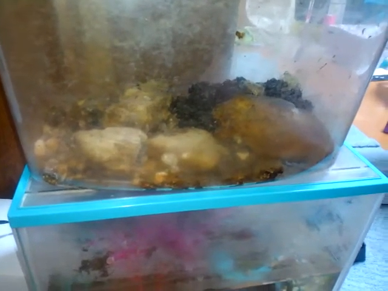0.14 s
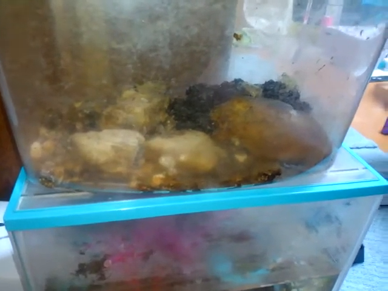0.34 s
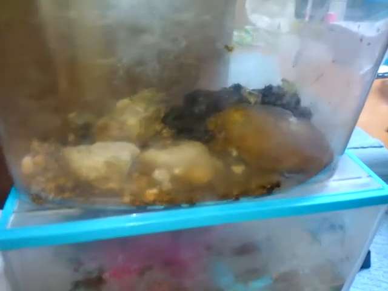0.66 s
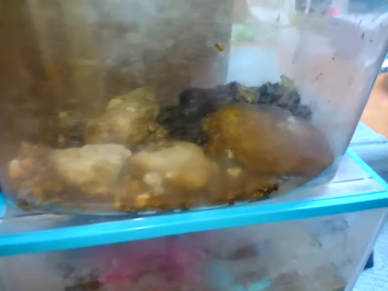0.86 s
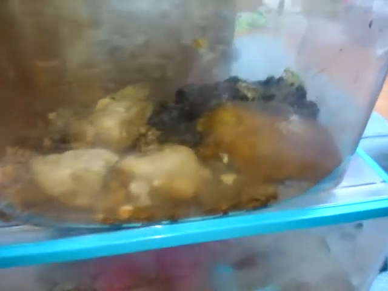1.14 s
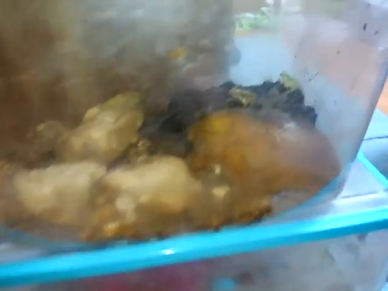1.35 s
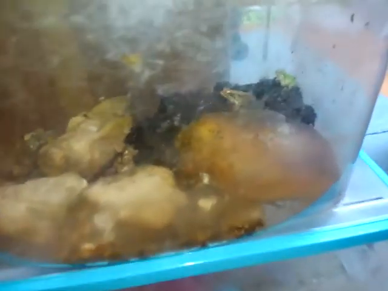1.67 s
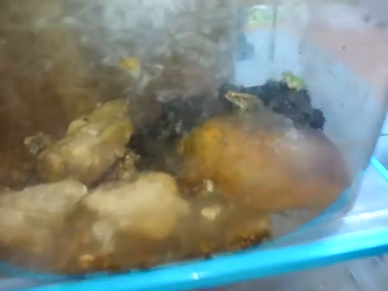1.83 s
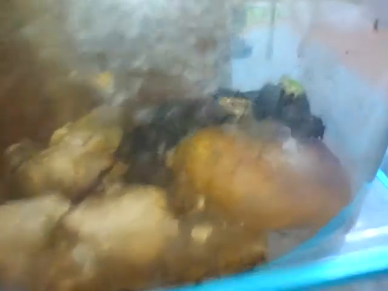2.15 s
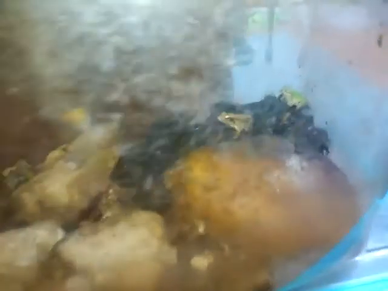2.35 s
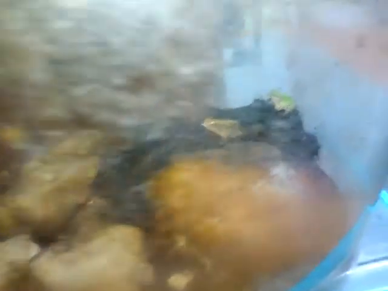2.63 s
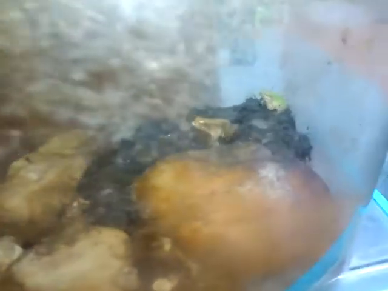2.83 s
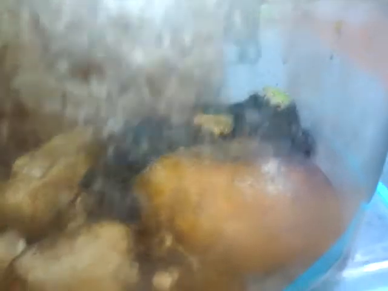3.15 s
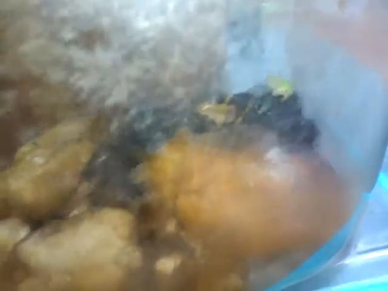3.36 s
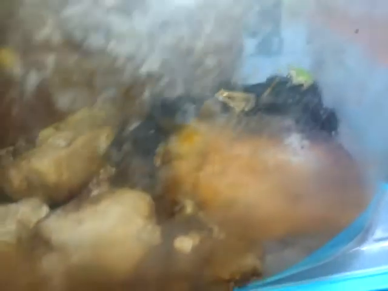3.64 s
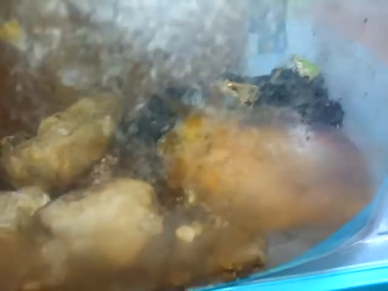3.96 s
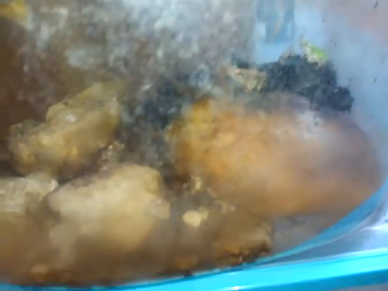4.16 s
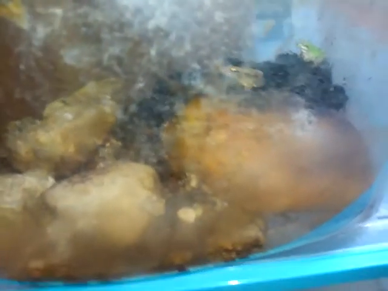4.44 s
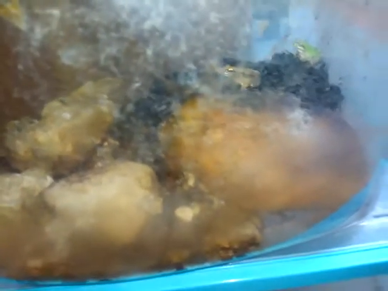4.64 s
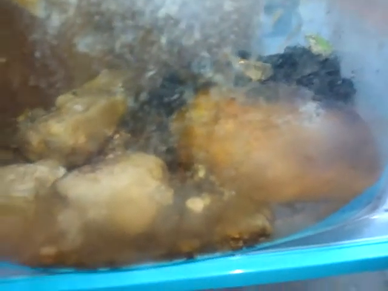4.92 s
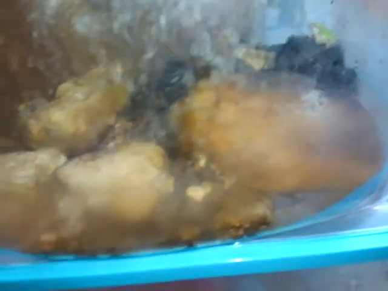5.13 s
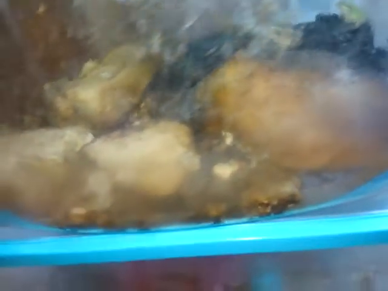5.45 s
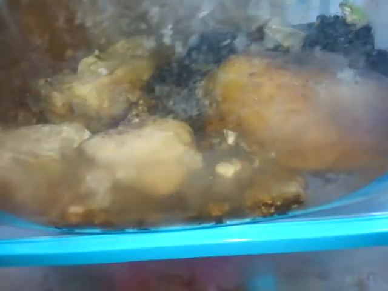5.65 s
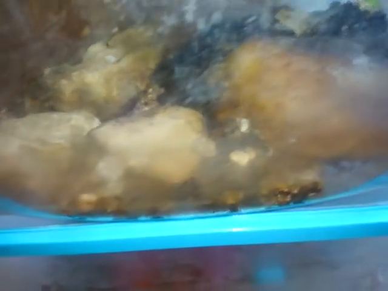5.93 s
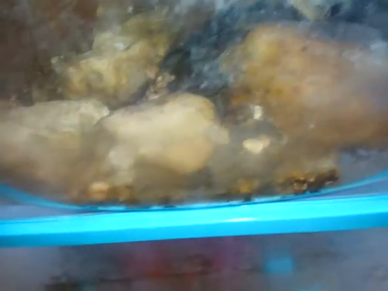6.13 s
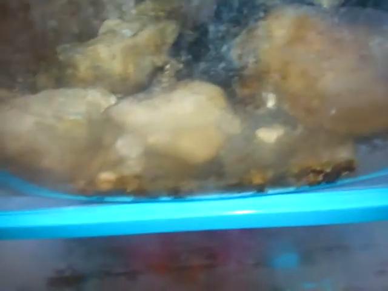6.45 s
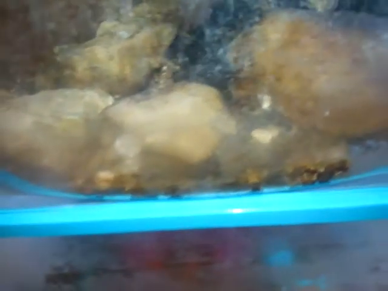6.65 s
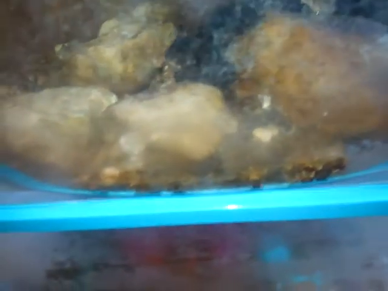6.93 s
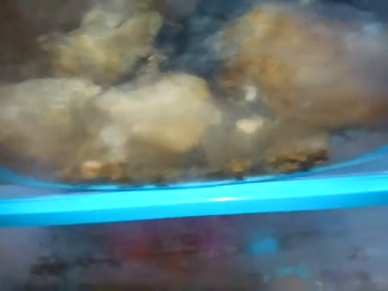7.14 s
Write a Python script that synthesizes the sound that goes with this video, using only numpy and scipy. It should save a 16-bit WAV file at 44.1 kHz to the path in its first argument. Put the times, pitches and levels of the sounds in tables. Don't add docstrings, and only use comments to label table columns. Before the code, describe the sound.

Even, piercing little chirps run from start to end, brighter at first, weaker around the third second, stronger again, then mostly softer late on. Each is a quick rattle of a dozen pure, high pulses with a thin rasp and short reflections. Behind it lie a faint continuous insect trill, steady microphone hiss, low room hum and gentle grip rumble, with a small knock near the beginning.

```python
import sys
import numpy as np
from scipy import signal
from scipy.fft import rfft, irfft
from scipy.io import wavfile
from scipy.ndimage import uniform_filter1d

SR = 44100
rng = np.random.default_rng(int(sys.argv[2]) if len(sys.argv) > 2 else 0)


def materialize(psi):
    bounded = np.clip(np.atleast_2d(psi).T, -1, 1)
    quanta = np.round(bounded * 32767).astype(np.int16)
    wavfile.write(sys.argv[1], SR, quanta)


def elevation(decibels):
    levels = np.asarray(decibels, float)
    return 10 ** (levels / 20)


N = 321489

# (time [s], length [ms], direct level [dB], wing pitch [Hz])
CHIRPS = [(-0.0428, 77, -22.5, 7365), (0.2337, 67.5, -19.5, 7370), (0.4867, 63, -20, 7370),
          (0.7347, 62.6, -21, 7390), (0.9991, 68, -21.5, 7360), (1.2333, 69.4, -20, 7350),
          (1.4567, 61, -19.5, 7360), (1.6981, 72, -23.5, 7310), (1.9675, 71, -26.5, 7270),
          (2.227, 61, -30, 7320), (2.468, 69.4, -30, 7370), (2.7555, 64, -26, 7370),
          (3.0329, 68, -27.5, 7365), (3.3219, 69.6, -22, 7325), (3.5945, 68, -21.5, 7290),
          (3.8486, 66.7, -21.5, 7295), (4.1128, 67.5, -23, 7260), (4.3648, 65, -27.5, 7270),
          (4.6283, 71.4, -22.5, 7320), (4.889, 59.4, -22, 7360), (5.1378, 65, -27.5, 7260),
          (5.4137, 65, -27.5, 7280), (5.6722, 69, -25, 7290), (5.9247, 63, -23, 7300),
          (6.1755, 76, -27.5, 7200), (6.4264, 69, -31, 7310), (6.6936, 54.5, -27.5, 7350),
          (6.9442, 67, -26.5, 7370), (7.2157, 67, -25.5, 7350)]


def evened(x):
    return x / np.sqrt(np.mean(x ** 2) + 1e-20)


def read(points, hz):
    f, value = np.transpose(points)
    return np.interp(np.log(hz + 1), np.log(f + 1), value)


def add(mix, s, sound):
    at = round(s * SR)
    sound = sound[max(-at, 0):]
    part = mix[max(at, 0):][:len(sound)]
    part += sound[:len(part)]


def coloured(points):
    gain = elevation(read(points, np.fft.rfftfreq(N, 1 / SR)))
    return evened(irfft(rfft(rng.standard_normal(N)) * gain, N))


def resonate(x, hz, width):
    turn = np.exp(2j * np.pi * np.cumsum(hz * np.ones(len(x))) / SR)
    r = np.exp(-np.pi * width / SR)
    once = signal.lfilter([1 - r], [1, -r], x / turn)
    twice = signal.lfilter([1 - r], [1, -r], once)
    return 2 * (turn * twice).real


def drift(seconds):
    size = round(seconds * SR)
    once = uniform_filter1d(rng.standard_normal(N), size=size)
    return evened(uniform_filter1d(once, size=size))


def cricket():
    # (time [s], level [dB])
    low_mode = [(0, -37), (.8, -34.5), (1.3, -42.5), (1.95, -36), (2.7, -38.5), (3.9, -43.5), (4.4, -36.5),
                (5.6, -35.5), (6.7, -39), (7.3, -36)]
    trials = [
        2.222,
        2.749,
        5.665,
        6.687,
    ]
    gap_ms = 5.1
    slowing = 0.13
    start_db, swell_share, swell_bend, tire_db = -23, 0.46, 1.33, -2
    first_db = 3.5
    uneven_db, uneven_pitch = 1.3, 0.0035
    usual_db, echo_base_db, echo_follows = -24, -28, 0.26

    tone, sent, gate = np.zeros((3, N))
    chance = rng.standard_normal((len(CHIRPS), 19, 5))
    for (s, length_ms, level_db, hz), dice in zip(CHIRPS, chance):
        count = min(round(length_ms / gap_ms) + 1, 18)
        echo_db = echo_base_db - level_db + echo_follows * (level_db - usual_db)
        low_db = np.interp(s, *np.transpose(low_mode)) + dice[-1, 0]
        rasp_db = -46 + 0.62 * dice[-1, 1]
        for k, (late, loud, sharp, phase, low_phase) in enumerate(dice[:count]):
            along = k / (count - 1)
            slowed = along - slowing * along * (1 - along)
            at = s + (length_ms * slowed + 0.1 * late - 2.2) / 1000
            pitch = hz * (1 + 0.013 * (0.5 - along) - 0.016 * along ** 4 + uneven_pitch * sharp)
            swell_db = start_db * max(1 - along / swell_share, 0) ** swell_bend
            swell_db += tire_db * along ** 4 + first_db * (k == 0)
            burst = elevation(level_db + swell_db + uneven_db * loud) * stroke(pitch, 4.36, 0.026, phase)
            add(tone, at, burst)
            add(sent, at, elevation(echo_db) * burst)
            low = stroke(6930 - 160 * along ** 2 + 60 * sharp, 4.8, 0.088, low_phase)
            low = elevation(-55 * np.maximum(0.8 - along, 0) ** 1.1) * low
            add(sent, at, elevation(low_db + 0.5) * low)
            add(tone, at + 0.00088, elevation(low_db + 5.0) * low)
            scrape_db = rasp_db - 20.6 * (along - 0.45) ** 2 + 2.8 * late
            add(gate, at, elevation(scrape_db) * np.hanning(230))
    for s in trials:
        add(tone, s - 0.0022, elevation(-55) * stroke(7200, 4.4, 0.018, 0))
        add(gate, s - 0.0022, elevation(-55) * np.hanning(230))
    return tone, sent, gate


def stroke(hz, length_ms, glide, phase):
    u = np.linspace(0, 1, round(length_ms * SR / 1000))
    turns = np.cumsum(hz * (1 - glide * (u - 0.5))) / SR
    return np.sin(np.pi * u) ** 1.45 * np.sin(2 * np.pi * (turns + phase))


def scraper(gate):
    # (frequency [Hz], density [dB per Hz])
    rasp = [(4710, -14), (8000, -1.5), (8450, -10.5), (8930, -9.5), (9160, -8.5), (9620, -7.5),
            (11300, -13.5), (11700, -17.5), (12800, -34), (16600, -70), (22000, -120)]
    core_hz = rng.uniform(9230, 10830, len(CHIRPS))
    chirp = np.searchsorted([row[0] - 0.05 for row in CHIRPS], np.arange(N) / SR) - 1
    core = evened(resonate(rng.standard_normal(N), core_hz[chirp], 720))
    below = [(1000, -36), (1600, -24.5), (5500, -27), (6200, -11.5), (6600, -17), (7200, -12)]
    skirt = below + [row for row in rasp if row[0] > 7500]
    return gate * (coloured(skirt) + 0.48 * core)


def room(x):
    # (frequency [Hz], time to fall 60 dB [s])
    near_walls = [(5000, 0.22), (7000, 0.15), (9000, 0.16), (12000, 0.06)]
    hall_t60, hall_db = 0.44, -25.5
    size = SR // 2
    taps = np.zeros((3, size))
    slots = np.arange(40, size - 12, 12)
    at = slots + rng.integers(0, 12, (3, len(slots)))
    np.put_along_axis(taps, at, rng.choice([-1., 1.], at.shape), 1)
    hz, t, z = signal.stft(taps, SR, nperseg=128)
    decay = elevation(-60 * t / read(near_walls, hz)[:, None]) + elevation(hall_db - 60 * t / hall_t60)
    decay = decay * (1 - 0.15 * np.exp(-t / 0.0041))
    tails = signal.istft(z * decay, SR, nperseg=128)[1]
    tails = tails / np.linalg.norm(tails[0])
    sway = np.pi * (np.arange(N) / SR * 1.3 + np.arange(3)[:, None] / 3)
    shared = x * np.cos(sway) / np.sqrt(1.5)
    return signal.oaconvolve(shared, tails, axes=1)[:, :N].sum(0)


def handling():
    # (time [s], level [dB], width [ms], direction [+1 or -1])
    bumps = [(1.2802, -36.5, 0.72, 1), (2.0243, -32.5, 0.91, -1), (2.5878, -40, 0.86, 1),
             (2.605, -41, 1.1, -1), (2.611, -47, 4.5, 1), (0.574, -35.5, 4.1, 1), (4.6, -40, 2.9, 1),
             (0.401, -47, 2.2, 1), (1.17, -41, 4.1, 1), (1.439, -43, 3.1, 1), (1.665, -38.5, 3.3, -1),
             (3.851, -39, 3.7, 1)]
    # (time [s], level [dB], length [ms], centre [Hz], width [Hz])
    rustles = [
        (1.208, -48, 13, 930, 60),
        (1.210, -48, 14, 560, 60),
        (1.208, -55, 11, 2100, 1800),
        (4.286, -62, 18, 10000, 4000),
        (4.286, -66, 10, 6000, 4000),
        (4.329, -66, 10, 9500, 4000),
        (5.593, -62, 28, 10300, 3000),
        (5.593, -66, 14, 5000, 4000),
        (5.27, -66, 14, 3500, 3000),
    ]
    t = np.arange(N) / SR
    squeeze = np.max([np.exp(-((t - row[0]) / 0.034) ** 2) for row in bumps], axis=0)
    rumble = coloured([(8, -15), (20, 5.5), (70, -0.5), (130, -33.5)])
    rumble = rumble / abs(uniform_filter1d(rumble ** 2, size=5000)) ** 0.5
    out = elevation(-55.5 + 2.5 * squeeze + 1.5 * drift(0.12)) * rumble
    for s, level_db, width_ms, direction in bumps:
        u = np.arange(-3, 12, 1000 / SR / width_ms)
        push = np.exp(-u ** 2 * np.where(u < 0, 2.5, 0.6))
        push -= 0.29 * np.exp(-((u - 5) / 3) ** 2)
        add(out, s - 3 * width_ms / 1000, elevation(level_db) * np.sign(direction) * push)
    for s, level_db, length_ms, hz, width in rustles:
        u = np.arange(0, 2, 1000 / SR / length_ms)
        grit = resonate(rng.standard_normal(4000), hz, width)[:len(u)]
        add(out, s, elevation(level_db) * evened(grit) * np.minimum(u * 12, 1) * np.exp(-u ** 3))
    return out


def far_crickets():
    # (time [s], dip [dB])
    pauses = [(0.44, -5), (0.76, -1), (1.27, -5.0), (1.64, -9), (2.18, -4.0), (2.58, -2), (2.79, -10),
              (3.1, -4.0), (3.58, -11), (3.82, -9), (4.04, -9), (4.37, -5), (4.81, -6.0), (5.28, -4),
              (5.57, 0), (5.8, 0), (6.01, -2), (6.56, 0), (6.94, -8), (7.22, -5)]
    # (pitch [Hz], width [Hz], level [dB], start [s], end [s])
    chorus = [
        (8690, 470, -74, 0., 3.8),
        (5280, 130, -78.5, 0., 8.7),
    ]
    pause_s, pause_depth = 0.037, 1.7
    t = np.arange(N) / SR
    far_db = sum(pause_depth * db * np.exp(-((t - s) / pause_s) ** 2) for s, db in pauses)
    far_db = far_db - 65 - 0.48 * t
    farther_db = -73.5 + 0.27 * (far_db - far_db.mean())
    out = trill(5268, far_db, 62, 0.61, 20, 1.1)
    out += trill(5050, farther_db, 47, 0.98, 44.8, 3.9)
    for hz, width, level_db, start, end in chorus:
        fade = np.clip(np.minimum(t - start + 0.3, end - t) / 0.24, 0, 1)
        swell_db = 2.0 * evened(uniform_filter1d(rng.standard_normal(N), 6000))
        out += elevation(level_db + swell_db) * fade * evened(resonate(rng.standard_normal(N), hz, width))
    return out


def trill(hz, level_db, per_s, blur_share, waver_hz, flutter_db):
    t = np.arange(N) / SR
    wander = uniform_filter1d(rng.standard_normal(N), size=3000).cumsum() / 75
    syllables = 0.35 + np.sin(np.pi * (per_s * t + wander)) ** 2
    pitch = hz + waver_hz * drift(0.03)
    blur = evened(resonate(rng.standard_normal(N), pitch, 140))
    whistle = np.sin(2 * np.pi * np.cumsum(pitch) / SR)
    tone = evened((whistle + blur_share * blur) * syllables)
    return tone * elevation(level_db + flutter_db * drift(0.082))


def noise_floor():
    # (frequency [Hz], density [dB per Hz])
    hiss = [(240, -35), (400, 0), (957, -0.5), (1060, -4), (3200, -13.5), (4670, -13), (5170, -9.5),
            (6250, -22.5), (7120, -28), (7660, -17), (8600, -18), (9390, -16), (12900, -28), (16800, -55),
            (22000, -120)]
    # (frequency [Hz], density [dB per Hz])
    hum = [(8.8, -38), (15, -21.5), (77, -1), (96, 1.5), (119, -18), (152, -5.5), (223, -15), (265, -8),
           (319, -13), (361, -11), (421, -32), (483, -10.5), (600, -23.5), (780, -40), (1320, -120)]
    bass_cut = [(60, -17.5), (110, 3.5), (600, -1.0)]
    hum = [(hz, db + read(bass_cut, hz)) for hz, db in hum]
    return elevation(-60) * coloured(hiss) + elevation(-57.5) * coloured(hum)


def noise_fill(mid):
    # (lower band edge [Hz], share of moments [0-1])
    filled = [(4100, .3), (5500, .35), (6900, .55), (8300, .75), (9600, .8), (11400, .65), (12900, 0.)]
    hz, t, z = signal.stft(mid, SR, nperseg=1024, noverlap=768)
    power = abs(z) ** 2
    loud_db = 10 * np.log10(abs(uniform_filter1d(power.sum(0), size=5)) + 1e-12)
    quiet = loud_db < np.where(hz < 8300, -48, -37)[:, None]
    edges, shares = np.transpose(filled)
    band = np.searchsorted(edges, hz) - 1
    mood = rng.standard_normal((len(t) // 4 + 1, len(edges)))
    mood = evened(uniform_filter1d(mood, size=3, axis=0))
    mood = mood + 0.7 * np.roll(mood, 1, 1)
    mood = np.repeat(mood, 4, 0)[:len(t)]
    chosen = mood.argsort(0).argsort(0) < shares * len(t)
    mask = chosen.T[band] * (band >= 0)[:, None] * quiet
    level = uniform_filter1d(uniform_filter1d(power, size=9, axis=0), size=4, axis=1)
    level = abs(level) ** 0.5
    noise = rng.standard_normal((len(t), len(hz), 2)) @ [1, 1j]
    return signal.istft(mask * level * noise.T, SR, nperseg=1024, noverlap=768)[1][:N]


def starve(mid):
    hz, t, z = signal.stft(mid, SR, nperseg=1024, noverlap=768)
    power = (abs(z) ** 2).sum(0)
    loud_db = 10 * np.log10(abs(uniform_filter1d(power, size=5)) + 1e-12)
    strain = np.clip((loud_db + 42) / 14, 0, 1)
    dice = rng.random((len(t) // 4 + 1, len(hz) // 2 + 1))
    dice = np.repeat(dice, 4, 0)[:len(t)].T
    below = ((hz > 1300) & (hz < 4900))[:, None]
    lost = (np.repeat(dice, 2, 0)[:len(hz)] < 0.33 * strain) * below
    lost = lost | (hz[:, None] > 13400 - 1500 * strain * dice[0])
    return signal.istft(z * ~lost, SR, nperseg=1024, noverlap=768)[1][:N]


def scene():
    tone, sent, gate = cricket()
    rasp = scraper(gate)
    near = tone + 0.63 * rasp + room(sent + rasp)
    return np.tile(near + far_crickets() + handling() + noise_floor(), (2, 1))


def top_cut(x):
    return signal.sosfilt(signal.butter(12, 13080, fs=SR, output="sos"), x)


def record(dry):
    low_pass = signal.firwin(401, 13010, window=("kaiser", 9), fs=SR)
    limited = signal.oaconvolve(dry, low_pass[None], "same")
    apart = elevation(-2.0) * noise_fill(limited[0])
    return top_cut(starve(limited[0]) + apart * [[1], [-1]])


dry = scene()
out = record(dry)
materialize(out)
```